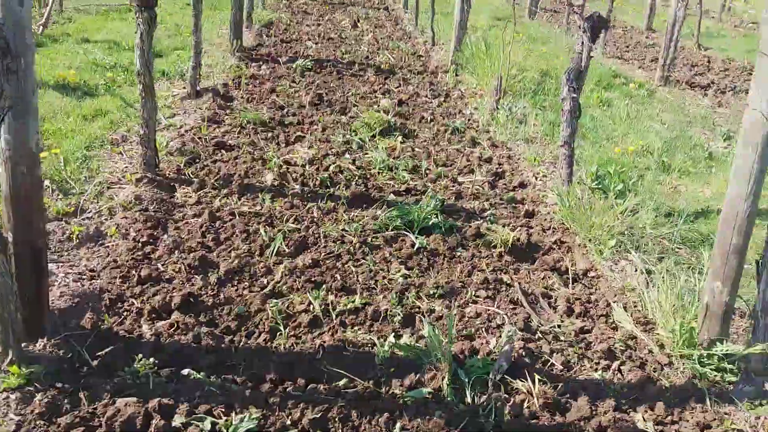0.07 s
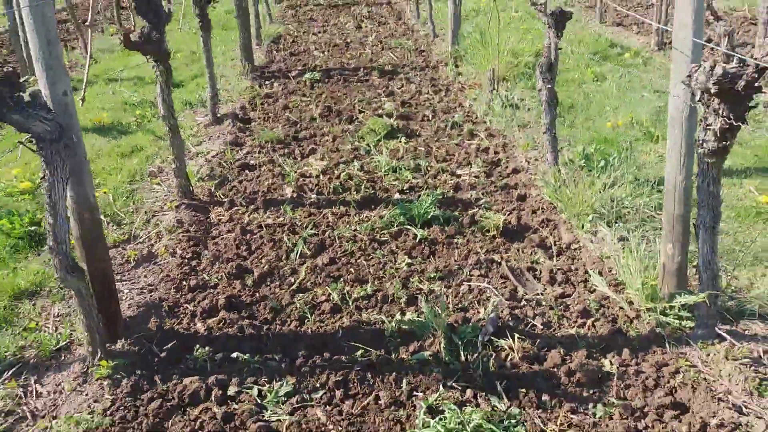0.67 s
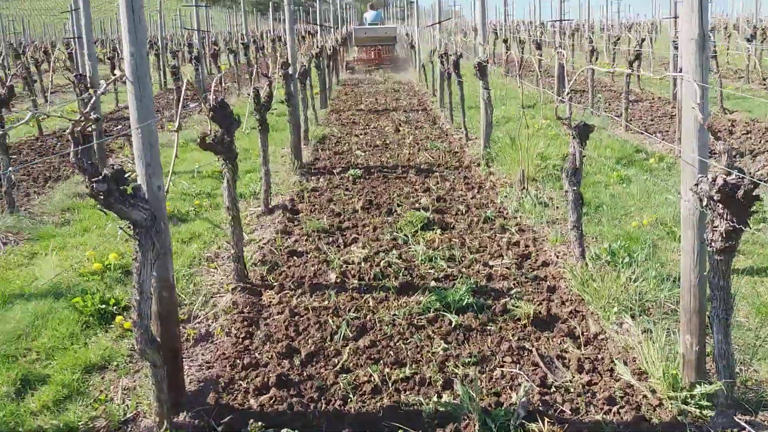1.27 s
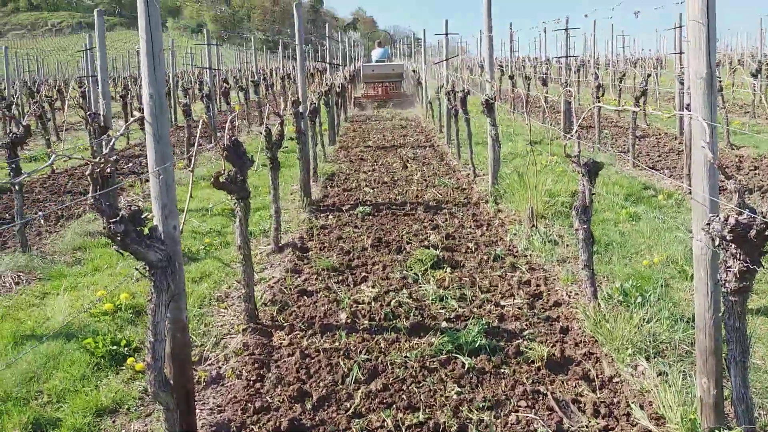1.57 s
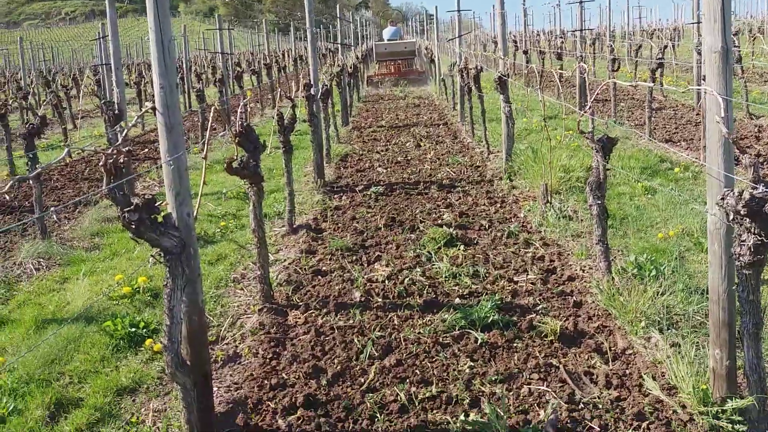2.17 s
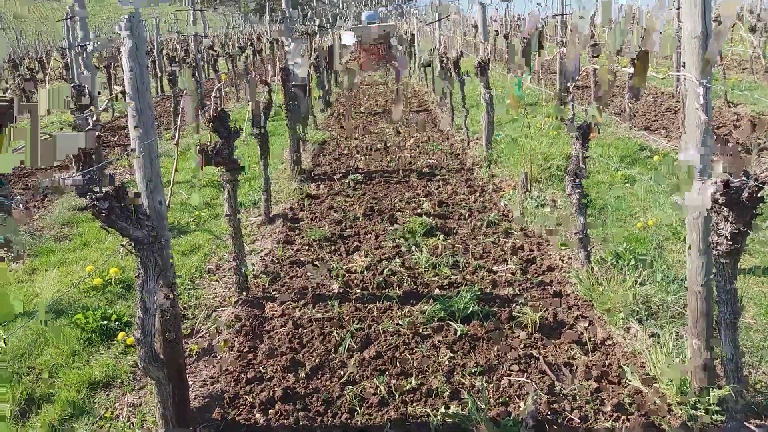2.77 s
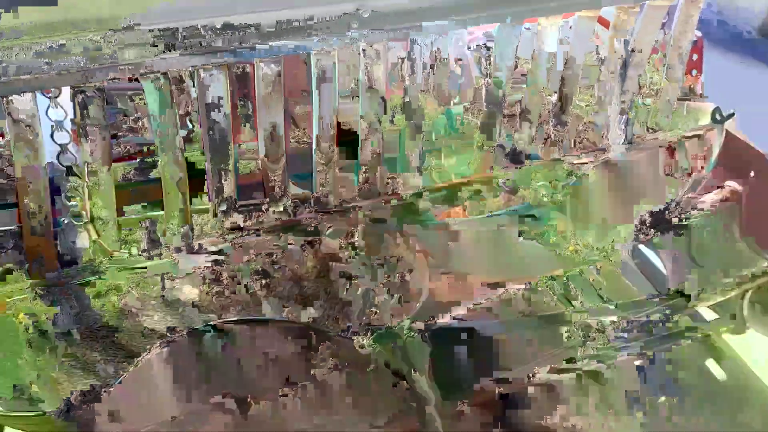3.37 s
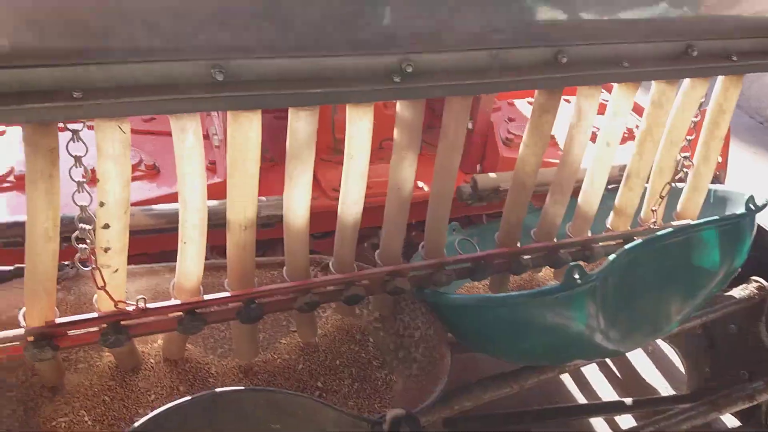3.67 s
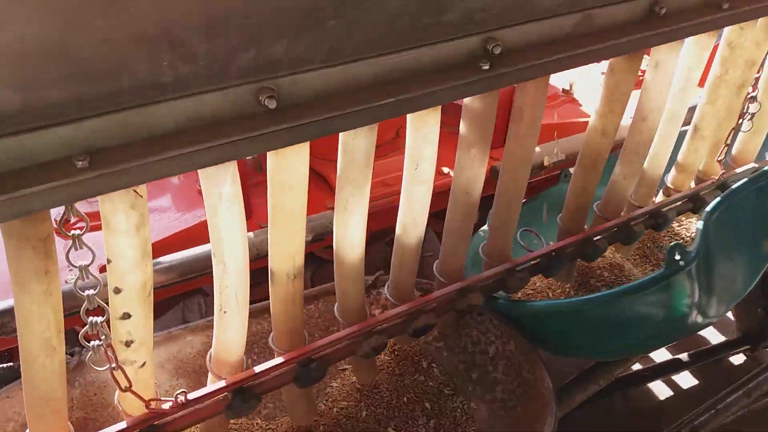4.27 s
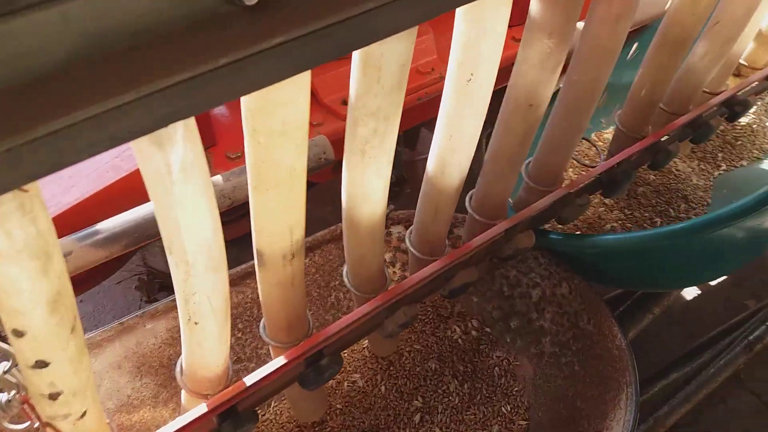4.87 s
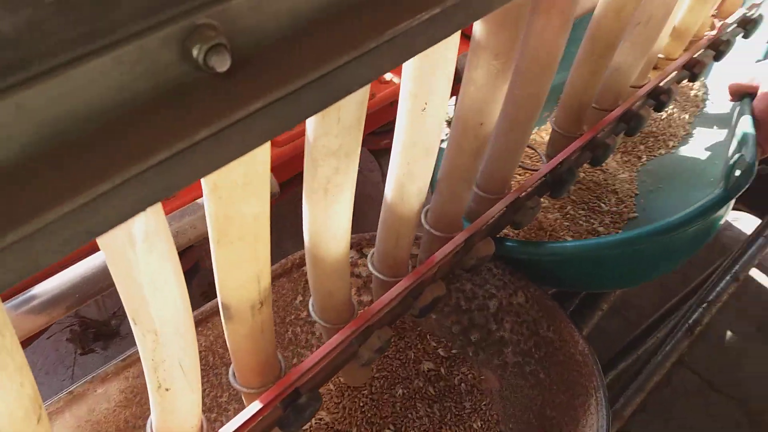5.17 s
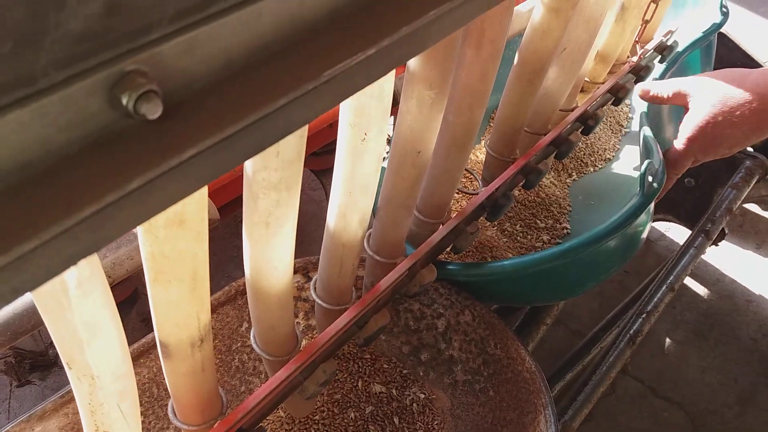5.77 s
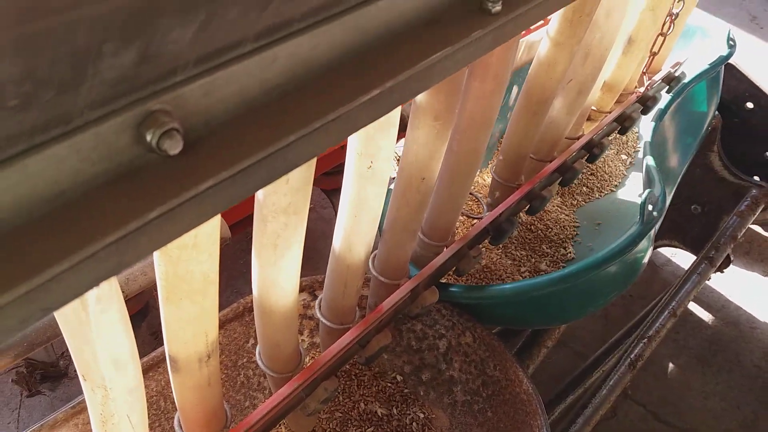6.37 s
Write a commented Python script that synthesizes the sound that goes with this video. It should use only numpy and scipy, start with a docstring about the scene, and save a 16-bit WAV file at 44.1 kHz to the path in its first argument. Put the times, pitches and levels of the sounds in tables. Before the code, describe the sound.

A diesel tractor drones steadily far down a vineyard row. Dry plants rustle faintly, a twig snaps nearby, and wind briefly buffets the microphone. The sound cuts abruptly to a seed drill heard up close, where grain falls into a plastic tray and a metal pan with a soft patter and bright ticks. A few dull bumps and light metallic pings come early, over a faint low hum.

```python
"""A tractor pulls a seed drill far down a vineyard row: each diesel firing sends a pulse down the
exhaust and a clatter through the engine panels. Dry plants rustle and snap; gusts buffet the microphone.
Then, abruptly, close to the drill: grain falls from its tubes into a plastic tray and a metal pan.
The heap damps the impacts to a patter, while the bare walls tick and ring.
With them come a faint hum, a few dull bumps and light metallic pings."""
import sys
import numpy as np
from scipy import signal
from scipy.fft import rfft, irfft
from scipy.io import wavfile
from scipy.ndimage import uniform_filter1d

SR = 44100
rng = np.random.default_rng(int(sys.argv[2]) if len(sys.argv) > 2 else 0)


def materialize(psi):
    """Save the field psi as 16-bit PCM at rate SR to the path in sys.argv[1].

    A 1-D psi becomes a single channel; in a 2-D psi each row is a channel.
    """
    bounded = np.clip(np.atleast_2d(psi).T, -1, 1)
    quanta = np.round(bounded * 32767).astype(np.int16)
    wavfile.write(sys.argv[1], SR, quanta)


N = 287091

# hard ticks heard through the microphone, which dips near 8 kHz: (frequency [Hz], relative density [dB])
TICK_AT_MIC = [(1200, -0.5), (2600, -8), (3300, -6.5), (4050, -7.5), (4400, 6), (5200, 2.5), (6200, -1),
               (7100, -5), (7600, -16.5), (8500, -15.5), (9300, -8), (10200, -8), (11400, -3.5),
               (12400, -4), (15500, -2)]


def from_db(db):
    """Decibels to amplitude ratio."""
    return 10 ** (np.asarray(db) / 20)


def unit_rms(x):
    """Normalisation to unit mean power."""
    return x / np.sqrt(np.mean(x ** 2) + 1e-20)


def in_time(rows):
    """Linear interpolation of each column of a time table at every sample."""
    s, *columns = np.transpose(rows)
    return [np.interp(np.arange(N) / SR, s, c) for c in columns]


def drift(corner_hz):
    """Low-passed noise: a slow random wander of unit RMS."""
    step = 40
    pole = np.exp(-2 * np.pi * corner_hz * step / SR)
    slow = signal.lfilter([1], [1, -2 * pole, pole * pole], rng.standard_normal(N // step + 2002))[2000:]
    return np.interp(np.arange(N) / step, np.arange(len(slow)), unit_rms(slow))


def filtered(x, order, hz, kind):
    """Maximally flat low-, high- or band-pass filter."""
    return signal.sosfilt(signal.butter(order, hz, kind, fs=SR, output="sos"), x)


def colour(x, spectrum):
    """Minimum-phase filter with the given spectrum, falling 12 dB per octave beyond its ends."""
    size = 8192
    hz, db = np.transpose(spectrum)
    log_hz = np.log(np.maximum(np.arange(size // 2 + 1) * SR / size, 1))
    outside = np.maximum(np.log(hz[0]) - log_hz, 0) + np.maximum(log_hz - np.log(hz[-1]), 0)
    cepstrum = irfft(np.log(from_db(np.interp(log_hz, np.log(hz), db))) - 2 * outside)
    cepstrum[1:size // 2] *= 2   # folding the cepstrum makes the filter causal
    cepstrum[size // 2 + 1:] = 0
    return signal.fftconvolve(x, irfft(np.exp(rfft(cepstrum))))[:N]


def resonate(x, modes):
    """Modal superposition: damped resonators driven in parallel."""
    out = 0
    for hz, width, db in modes:
        r = np.exp(-np.pi * width / SR)
        feedback = [1, -2 * r * np.cos(2 * np.pi * hz / SR), r * r]
        out = out + from_db(db) * (1 - r * r) / 2 * signal.lfilter([1, 0, -1], feedback, x + 1e-18)
    return out


def even(x, span_s):
    """Running normalisation: mean power stays near 1 while single impacts keep their contrast."""
    width = int(span_s * SR / 2) + 1
    power = np.abs(uniform_filter1d(uniform_filter1d(x * x, width), width))
    return x / np.sqrt(power + 1e-6 * np.mean(x * x))


def impacts(per_s, spread_db):
    """A random point process: clicks of log-normal strength."""
    return (rng.random(N) < per_s / SR) * from_db(spread_db * np.clip(rng.standard_normal(N), -2, 2))


def strikes(rows):
    """One impulse for each (time [s], level [dB])."""
    out = np.zeros(N)
    for s, db in rows:
        out[int(s * SR)] = from_db(db)
    return out


def scatter(clicks, t60_s, spots, spacing_hz=5):
    """Impulse responses: each click excites one of several spots, each with its own random modes."""
    size = 8192
    t = np.arange(min(int(t60_s * SR) + 2, size)) / SR
    spectra = rfft(rng.standard_normal((spots, size)))
    is_mode = rng.random(spectra.shape) < SR / size / spacing_hz
    rings = irfft(spectra * is_mode)[:, :len(t)] * from_db(-60 * t / t60_s)
    rings = rings / np.linalg.norm(rings, axis=1, keepdims=True)
    out, spot = np.zeros(N + size), rng.integers(0, spots, N)
    for at in np.flatnonzero(clicks):
        out[at:at + len(t)] += clicks[at] * rings[spot[at]]
    return out[:N]


def tractor(exhaust_db=-17.4, recede_db_per_s=0.74, rumble_db=-17, knock_depth=0.1, panel_db=-3):
    """Periodic excitation: firings drive exhaust harmonics and modulate the engine's clatter."""
    # engine speed: (time [s], firing rate [Hz])
    speed = [(0, 51.12), (.55, 51.15), (.78, 51.0), (1.4, 51.26), (1.95, 51.15), (2.35, 51.32),
             (2.65, 51.22)]
    # exhaust harmonics: (multiple of the firing rate, relative level [dB])
    harmonics = [(1, -14.5), (2, 7.5), (3, 5.5), (4, -5.5), (5, -15.5), (6, -23.5), (7, -40)]
    # exhaust rumble: (frequency [Hz], relative density [dB])
    rumble_spectrum = [(25, -38), (42, -29), (65, -4), (120, -6.5), (175, -0.5), (240, -7.5), (320, -23),
                       (450, -20)]
    # diesel clatter heard through the microphone, which dips near 8 kHz:
    # (frequency [Hz], relative density [dB])
    clatter_at_mic = [(330, -20.5), (540, 3), (800, 0.5), (1020, 2), (1200, 7), (1800, 4.5), (2450, -12.5),
                      (3100, -14), (4700, -19), (6300, -21), (7700, -36), (8600, -39.5), (9800, -32),
                      (15800, -41.5)]
    # strength of the clatter: (time [s], level [dB])
    clatter_level = [(0, -33.5), (.6, -32), (1.2, -34), (2.1, -33), (2.65, -34.5)]
    # engine panels: (frequency [Hz], bandwidth [Hz], gain [dB])
    panel_modes = [(545, 20, -4), (666, 16, -3), (917, 35, 1), (1290, 60, -3), (1470, 110, 0),
                   (1780, 70, -4), (2160, 110, -2), (3480, 200, -17)]
    firing_hz, = in_time(speed)
    clatter_db, = in_time(clatter_level)
    phase = 2 * np.pi * np.cumsum(firing_hz) / SR - np.pi
    pulses = unit_rms(sum(from_db(db) * np.cos(k * phase + np.pi / 3) for k, db in harmonics))
    pulses *= from_db(.4 * drift(25))   # no two firings are quite alike
    rumble = from_db(rumble_db) * unit_rms(colour(rng.standard_normal(N), rumble_spectrum))
    # the exhaust fades as the tractor drives away
    exhaust = from_db(exhaust_db - recede_db_per_s * np.arange(N) / SR) * (pulses + rumble)
    # part of the clatter repeats with every working cycle of three firings
    cycle = rng.standard_normal(int(3 * SR / speed[0][1]))
    repeating = cycle[(phase / (6 * np.pi) % 1 * len(cycle)).astype(int)]
    bursts = (rng.standard_normal((2, N)) + .65 * repeating) * (1 + knock_depth * np.cos(phase))
    # the panels ring only in the midrange, below about 4 kHz
    panels = unit_rms(filtered(resonate(bursts[1], panel_modes), 4, 4200, "low"))
    clatter = unit_rms(unit_rms(colour(bursts[0], clatter_at_mic)) + from_db(panel_db) * panels)
    return exhaust + from_db(clatter_db + .5 * drift(11)) * clatter


def dry_plants():
    """Impulsive excitation: dense tiny clicks merge into a rustle, and single twigs snap."""
    # swells of rustling: (centre time [s], duration [s], relative level [dB])
    rustles = [(.15, .3, -56), (0.948, 0.37, -55.5), (1.675, 0.2, -57)]
    # twigs snapping close by: (time [s], relative level [dB])
    twigs = [(.516, -17), (.553, -36), (.893, -32), (1.104, -37), (1.15, -33)]
    t = np.arange(N) / SR
    swells = sum(from_db(db) * np.exp(-2 * ((t - s) / length) ** 2) for s, length, db in rustles)
    rustle = swells * unit_rms(impacts(700, spread_db=4))
    snaps = scatter(strikes(twigs), t60_s=.015, spots=2)
    return colour(snaps + rustle, TICK_AT_MIC)


def wind(rise_db_per_s=188, fall_db_per_s=150, lumpy_db=3, rasp_db=-16, rasp_hz=480):
    """Turbulence: eddies buffet the microphone, and the strongest gusts also rasp higher up."""
    # gust peaks: (time [s], level [dB])
    gusts = [(1.93, -24.5), (1.984, -17), (2.13, -22), (2.225, -20), (2.44, -26)]
    # eddy pressure: (frequency [Hz], relative density [dB])
    eddy_spectrum = [(30, -45), (60, -5.5), (120, -0.5), (250, -7.5), (380, -18), (600, -31), (1200, -43)]
    t = np.arange(N) / SR
    swells_db = [db - np.maximum(rise_db_per_s * (s - t), fall_db_per_s * (t - s)) for s, db in gusts]
    gust_db = np.max(swells_db, axis=0)
    eddies = colour(rng.standard_normal(N) * from_db(lumpy_db * drift(22)), eddy_spectrum)
    rasp = unit_rms(filtered(rng.standard_normal(N), 2, [rasp_hz / 2, rasp_hz * 1.3], "band"))
    return from_db(gust_db) * (even(eddies, 0.072) + from_db(rasp_db + gust_db - gust_db.max()) * rasp)


def heap(plastic_db=-4, drumming_db=-46):
    """Damped impact: the heap deadens the kernels' blows but passes them on to the plastic tray."""
    # flow of grain onto the heap: (time [s], level [dB])
    flow = [(2.68, -40), (3.1, -33.5), (3.32, -32), (3.42, -39.5), (3.5, -30), (3.87, -33), (3.99, -35),
            (4.23, -35), (4.3, -32), (4.8, -29.5), (4.86, -41.5), (4.94, -29), (5.12, -30.5), (5.24, -37.5),
            (5.6, -34), (5.92, -31.5), (6.3, -28), (6.5, -34)]
    # soft impacts and their low drumming: (frequency [Hz], relative density [dB])
    patter_spectrum = [(450, -46), (620, -35.5), (750, -47), (1000, -19.5), (1200, -7.5), (1620, 0.5),
                       (2000, -5), (2400, -11), (2950, -8.5), (3250, -16.5), (3550, -15.5), (4000, -29),
                       (8000, -38.5)]
    drumming_spectrum = [(25, -37), (60, -12), (110, -6), (190, 0), (260, -3.5), (350, -3.5), (450, -16),
                         (700, -5), (1200, -31.5)]
    # plastic tray: (frequency [Hz], bandwidth [Hz], gain [dB])
    tray_modes = [(745, 20, -8), (867, 20, -7), (1170, 25, -2), (1236, 20, 0), (1390, 25, -1),
                  (1480, 20, 1), (1600, 45, 0), (1790, 35, -1), (2020, 45, -3)]
    flow_db, = in_time(flow)
    soft = impacts(600 * from_db(2 * drift(20)), spread_db=4.5)
    grain = colour(scatter(soft, t60_s=0.068, spots=96, spacing_hz=220), patter_spectrum)
    tray = resonate(scatter(soft, t60_s=0.0034, spots=12), tray_modes)
    drumming = colour(scatter(soft, t60_s=0.044, spots=12), drumming_spectrum)
    patter = unit_rms(grain) + from_db(plastic_db) * unit_rms(tray)
    envelope = np.hypot(from_db(flow_db), clump_envelope())   # flow and clumps add in power
    return envelope * even(patter, 0.14) + from_db(drumming_db) * even(drumming, 0.48)


def pan(clicks, bright_db, modes_db, crack_db, t60_s):
    """Hard impact: brief contact gives a bright crack, then the pan rings in free vibration."""
    # metal pan: (frequency [Hz], bandwidth [Hz], gain [dB])
    pan_modes = [(4340, 60, -7), (4505, 50, 1), (4730, 70, 2), (4860, 60, -3), (5010, 70, -7),
                 (5890, 70, -6), (6460, 80, -6), (11400, 300, -12), (14940, 200, -8)]
    crack = from_db(crack_db) * filtered(clicks, 1, 7500, "high")
    rings = scatter(clicks, t60_s, spots=96, spacing_hz=280)
    ticks = colour(crack + rings, TICK_AT_MIC)
    treble = filtered(ticks, 1, 9000, "high")
    ringing = resonate(scatter(clicks, t60_s=0.012, spots=16), pan_modes)
    return ticks + (from_db(bright_db) - 1) * treble + from_db(modes_db) * ringing


def walls(spray_db=0.5, hard_db=11.0, bounce_s=0.0024, bounce_loss_db=5):
    """Inelastic collision: amid a light spray on the bare walls, hard kernels rebound twice, weaker."""
    # flow of grain against the walls: (time [s], relative level [dB])
    flow = [(2.68, -30), (2.73, -35), (3.06, -31), (3.3, -31), (3.36, -35), (3.61, -30), (3.98, -35.5),
            (4.08, -30.5), (4.58, -30.5), (4.8, -27.5), (4.92, -33.5), (5.02, -27), (5.53, -29),
            (5.57, -42.5), (5.78, -43.5), (5.88, -29), (6.02, -36), (6.09, -26), (6.5, -30.5)]
    # timbre where the stream lands: (time [s], treble gain [dB], gain of the pan modes [dB])
    landing = [(2.67, 1.5, -12), (3.4, 2, -3), (4.0, -2.5, 9), (4.45, -5, 6.5), (4.8, -1, -7),
               (5.3, 0.5, 2.5), (6.0, 6.5, 14), (6.5, 3, 6)]
    # single hard kernels: (time [s], relative level [dB])
    kernels = [(2.7432, -26), (3.2784, -20), (3.9534, -24), (4.2253, -21), (4.3824, -24), (4.4523, -16),
               (4.6114, -16), (4.7177, -17), (4.8055, -12), (4.8294, -12), (4.8748, -16), (5.0948, -14),
               (5.1612, -11), (5.1841, -13), (5.2744, -11), (5.3088, -8), (5.3398, -11), (5.3667, -10),
               (5.4321, -9), (5.5054, -11), (5.5273, -12), (5.5772, -16), (5.6311, -19), (5.7319, -25),
               (5.7583, -20), (5.8047, -26), (5.8671, -20), (5.9459, -16), (5.9798, -14), (6.1025, -15),
               (6.2826, -15), (6.3759, -15)]
    flow_db, = in_time(flow)
    bright_db, modes_db = in_time(landing)
    light = impacts(540 * from_db(1.2 * drift(20)), spread_db=4.6)
    spray = pan(light, bright_db, modes_db, crack_db=-4, t60_s=0.052)
    touches = [(s + k * bounce_s * rng.uniform(.7, 1.3), db - k * bounce_loss_db)
               for s, db in kernels for k in range(3)]
    hard = pan(strikes(touches), bright_db=5, modes_db=modes_db, crack_db=0, t60_s=.024)
    return from_db(flow_db + spray_db) * even(spray, 0.22) + from_db(hard_db) * hard


def hum(waver_hz=1.25, waver_db=2):
    """Random modulation: a few low tones waver in pitch and level."""
    # tones of the hum: (frequency [Hz], relative level [dB])
    partials = [(188.4, -8), (230.5, -1.5), (306.8, -12.5), (345, -11.5), (459, -17.5)]
    # strength of the hum: (time [s], level [dB])
    level = [(2.67, -45), (4.4, -48), (5.0, -43.5), (5.5, -40.5), (6.5, -41)]
    level_db, = in_time(level)
    tones = 0
    for hz, db in partials:
        amplitude = from_db(db + waver_db * drift(1.5))
        phase = 2 * np.pi * np.cumsum(hz + waver_hz * drift(9.1)) / SR
        tones += amplitude * np.sin(phase)
    return np.sqrt(2) * from_db(level_db) * tones


def clump_envelope(slide_t60_s=.16):
    """Exponential decay of the patter as each clump lands at once and slides to rest."""
    # clumps of grain dropping on the heap: (time [s], level [dB])
    drops = [(2.764, -31), (2.945, -31), (3.02, -26.5), (3.485, -34), (3.645, -23), (3.828, -28.5),
             (3.879, -27), (4.045, -28), (4.128, -26.5), (4.31, -28.5), (4.875, -25), (4.98, -21.5),
             (5.175, -27), (5.347, -28), (5.49, -27.5), (5.961, -27), (6.173, -23.5)]
    t = np.arange(N) / SR
    return sum((t >= s) * from_db(db - 60 * np.abs(t - s) / slide_t60_s) for s, db in drops)


def bumps(thud_t60_s=0.12, boom_t60_s=0.38, boom_db=-10, boom_hz=210, attack_s=0.0067):
    """Body resonance: after a short thud the hollow drill booms on, lower."""
    # soft knocks on the drill: (time [s], level [dB], upper band edge of the thud [Hz])
    knocks = [(2.782, -51, 397), (2.951, -39, 350), (3.045, -31, 302), (3.068, -19.5, 397),
              (3.11, -25, 308), (3.314, -20.5, 373), (3.375, -24.5, 260), (4.477, -37, 800),
              (5.55, -31.5, 250)]
    out, t = np.zeros(N), np.arange(SR // 2) / SR

    def octave_noise(top_hz):
        """Steady noise in the octave below top_hz."""
        band = filtered(rng.standard_normal(N // 8), 3, [top_hz / 2, top_hz], "band")
        return even(band, 0.021)[-len(t):]

    for s, db, thud_hz in knocks:
        thud = octave_noise(thud_hz) * from_db(-60 * t / thud_t60_s)
        boom = octave_noise(boom_hz) * from_db(boom_db - 60 * t / boom_t60_s)
        knock = (1 - np.exp(-t / attack_s)) * (thud + boom)
        at = int(s * SR)
        out[at:at + len(t)] += from_db(db) * knock[:N - at]
    return out


def pings(gain_db=8):
    """Free vibration: a small metal part rings when stray kernels strike it."""
    # stray kernels: (time [s], relative level [dB])
    hits = [(2.94, 1), (3.035, 3), (3.09, 2), (3.135, 3), (3.207, 8), (3.283, 9), (3.39, 1), (3.46, 0)]
    # small metal part: (frequency [Hz], bandwidth [Hz], gain [dB])
    part_modes = [(3430, 26, 1), (3620, 21, 0.54), (4600, 23, -0.74)]
    return from_db(gain_db) * resonate(strikes(hits), part_modes)


def scene(field_end_s=2.655, drill_start_s=2.671):
    """Superposition of sources: the field, an instant of silence, then the drill from close by."""
    t = np.arange(N) / SR
    field = np.clip((field_end_s - t) / .005, 0, 1) * (tractor() + wind() + dry_plants())
    drill = (t >= drill_start_s) * (heap() + walls() + pings() + bumps() + hum())
    return (field + drill)[None]


def record(dry):
    """Band limiting: a steep low-pass cuts the treble above 15.8 kHz."""
    return signal.sosfilt(signal.ellip(10, .2, 80, 15800, fs=SR, output="sos"), dry)


dry = scene()
out = record(dry)
materialize(out)
```